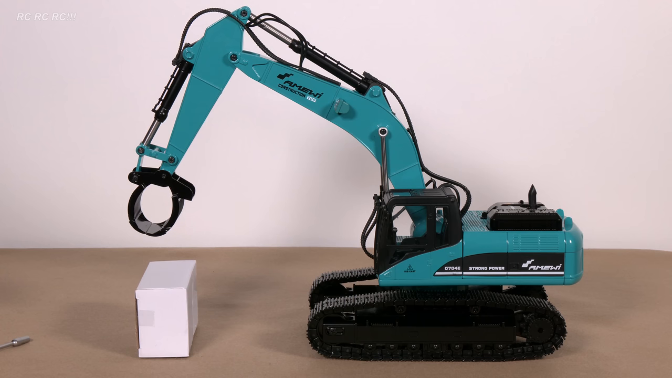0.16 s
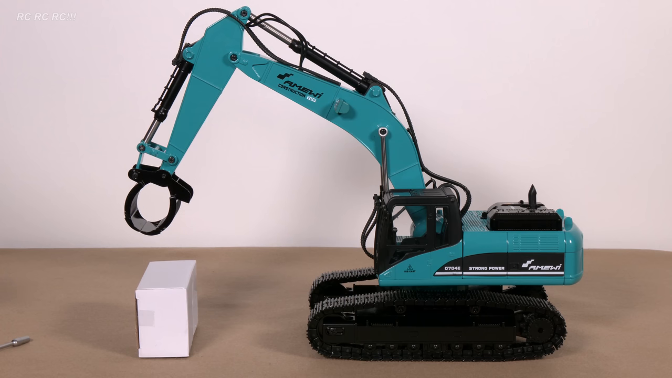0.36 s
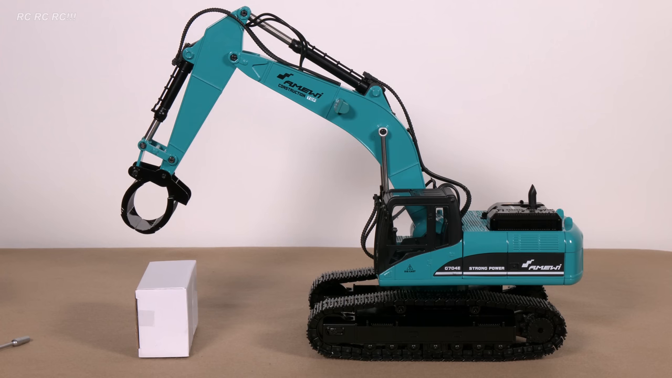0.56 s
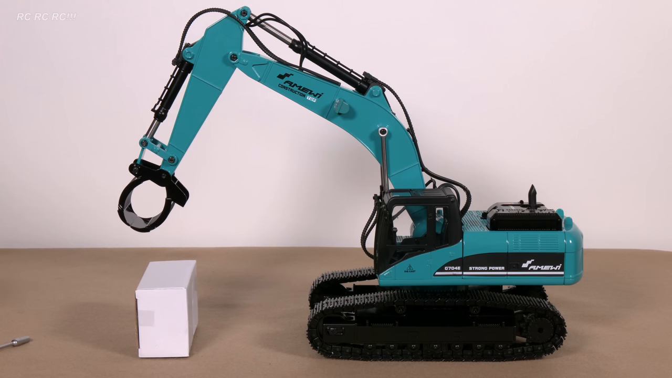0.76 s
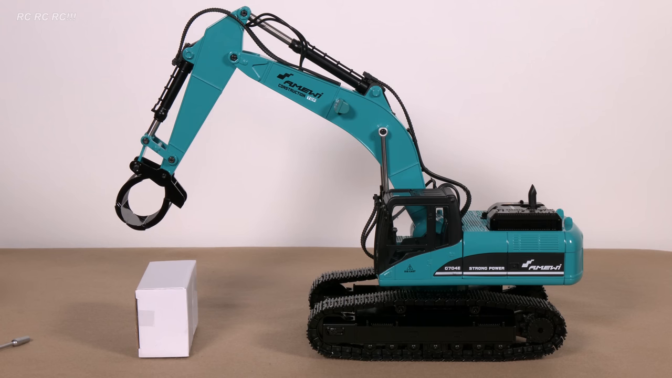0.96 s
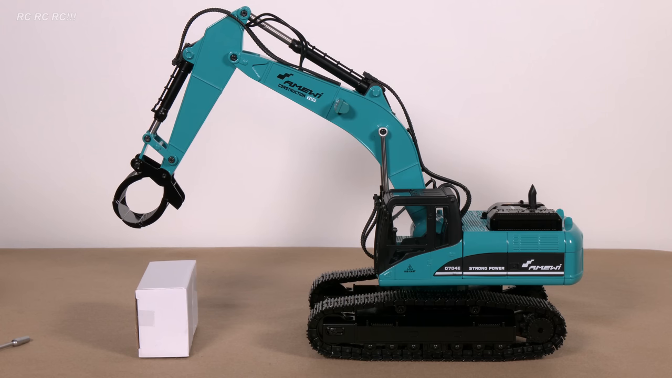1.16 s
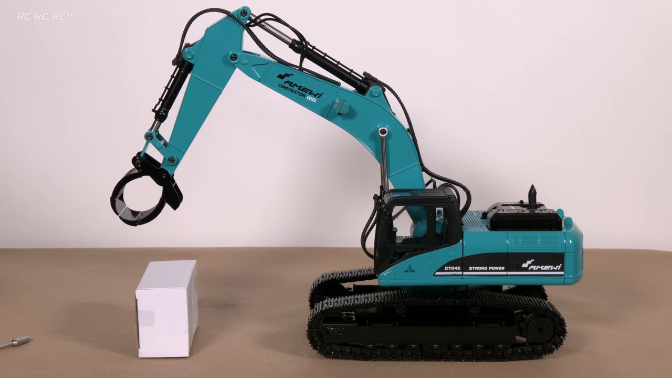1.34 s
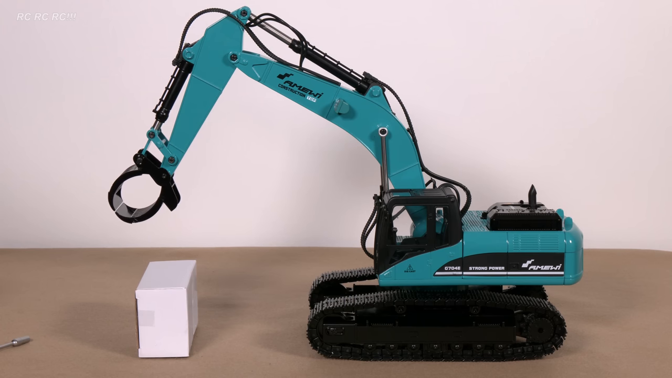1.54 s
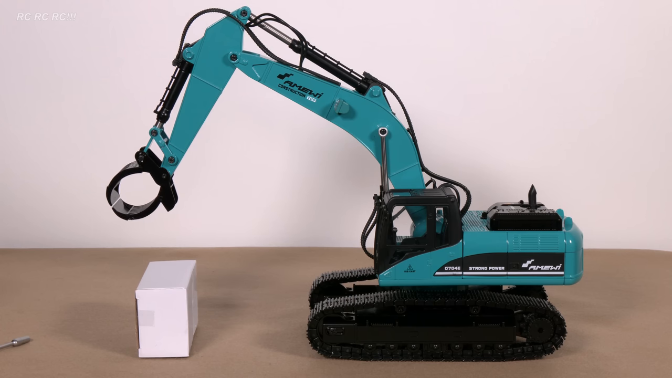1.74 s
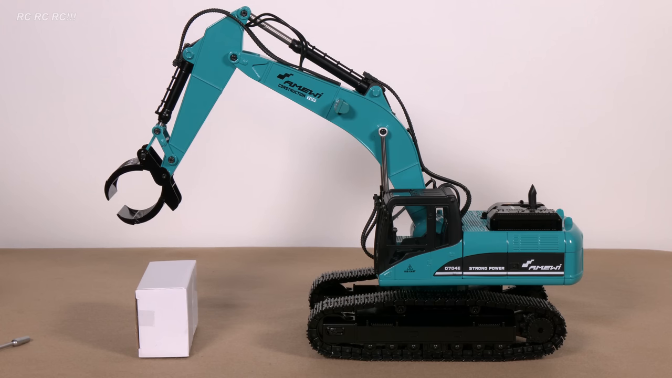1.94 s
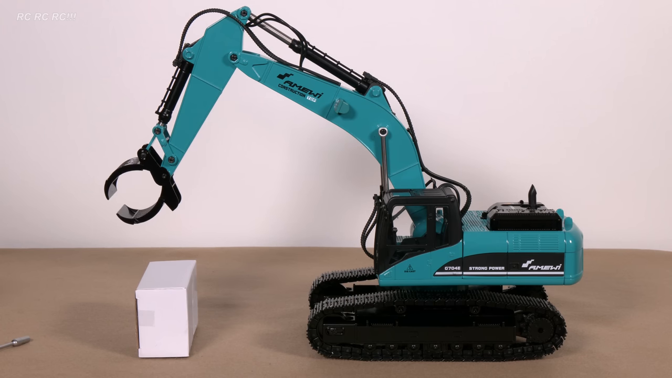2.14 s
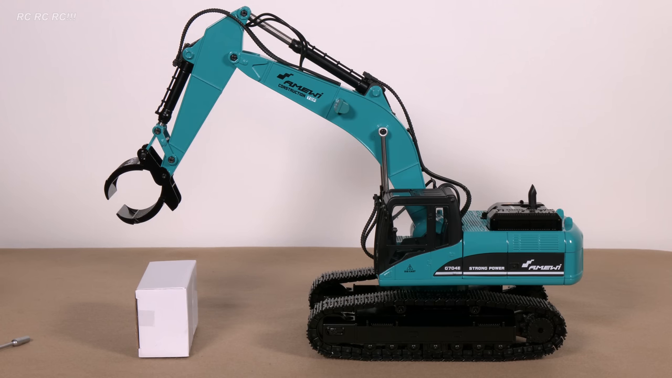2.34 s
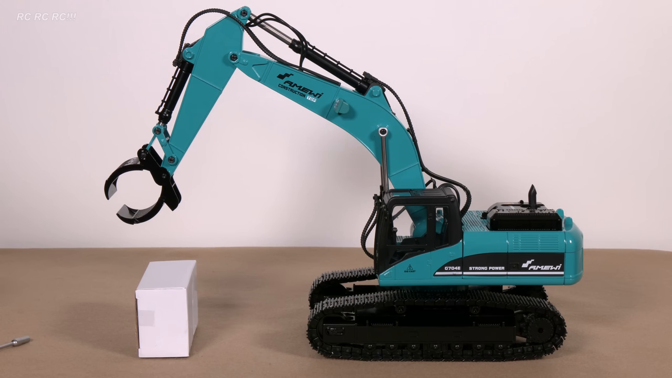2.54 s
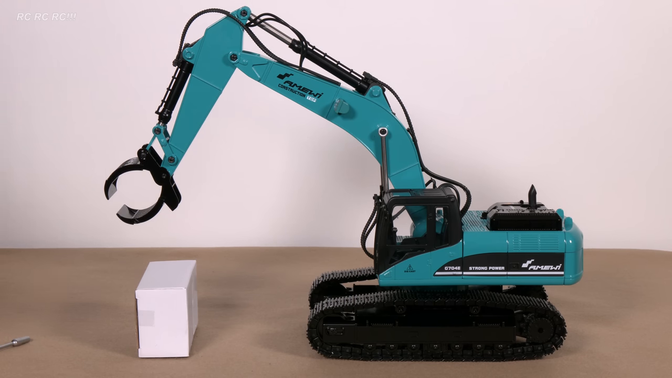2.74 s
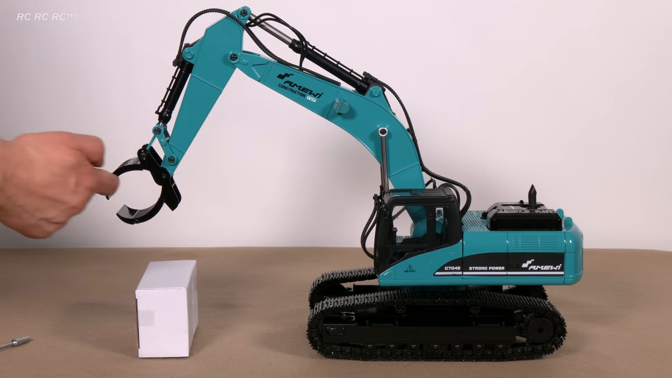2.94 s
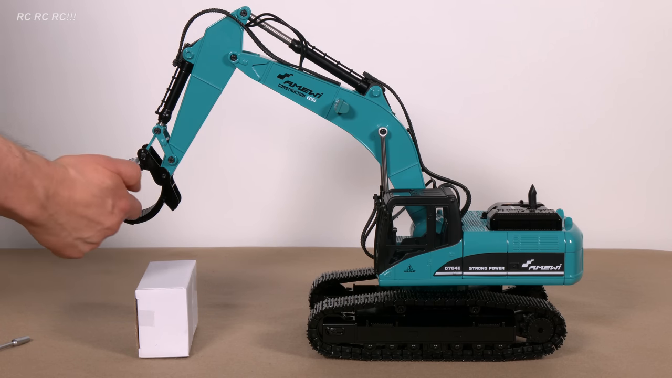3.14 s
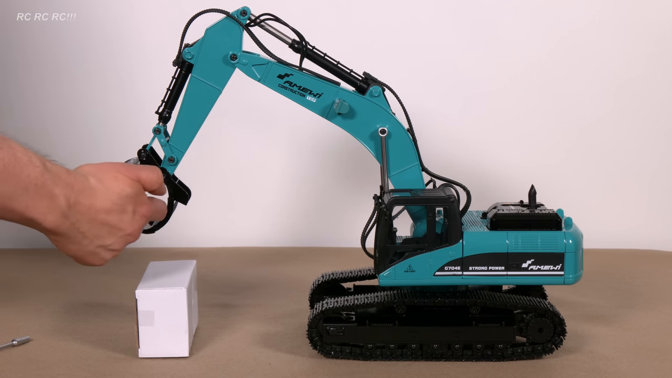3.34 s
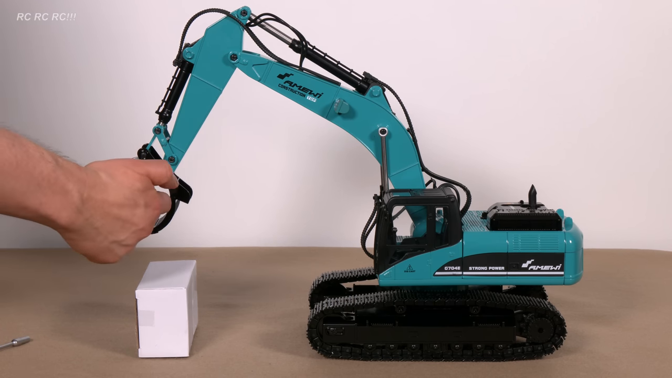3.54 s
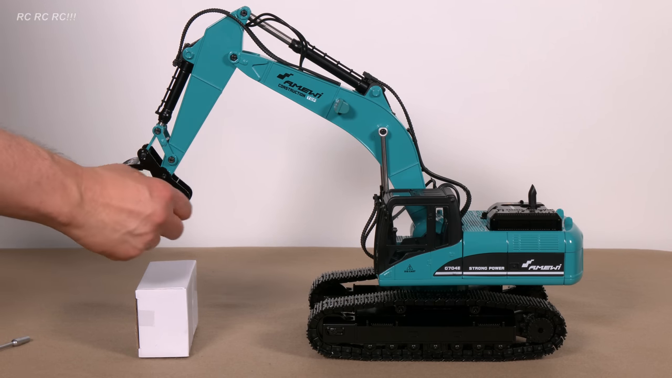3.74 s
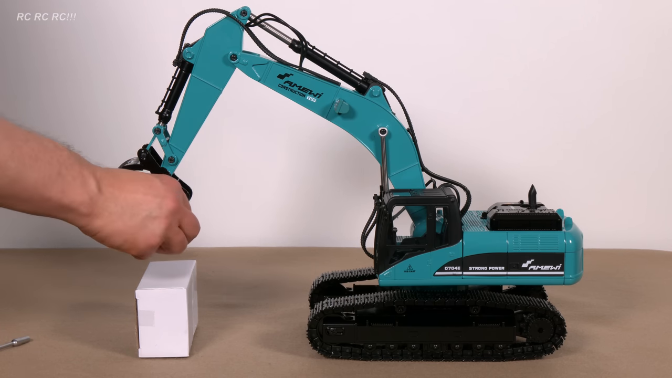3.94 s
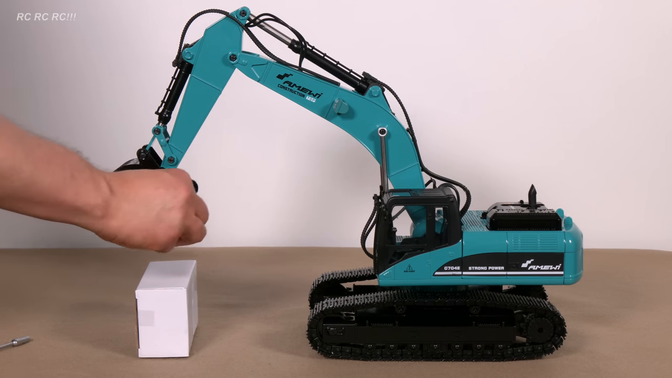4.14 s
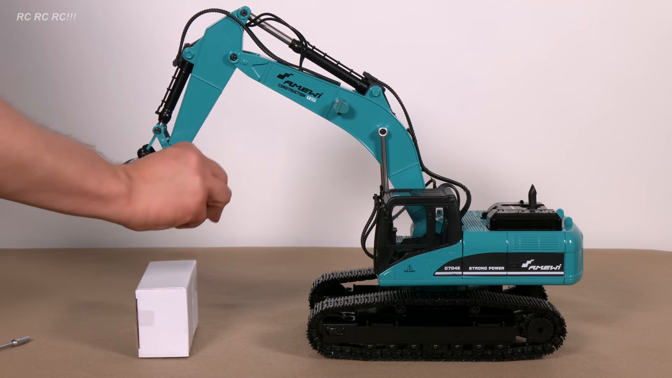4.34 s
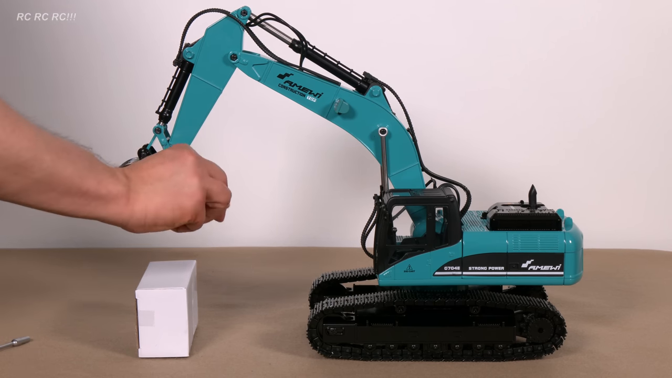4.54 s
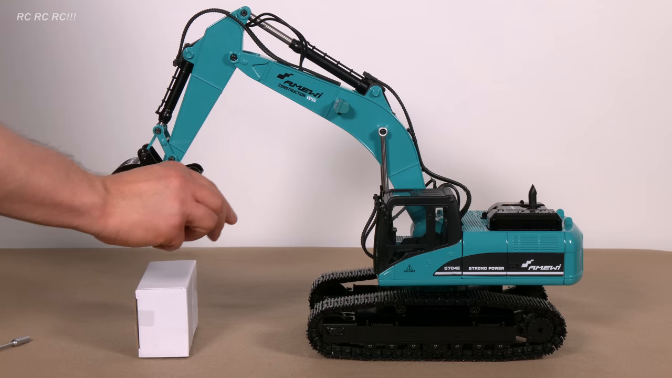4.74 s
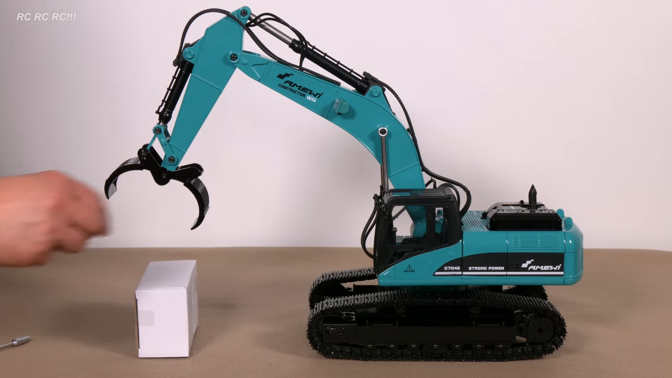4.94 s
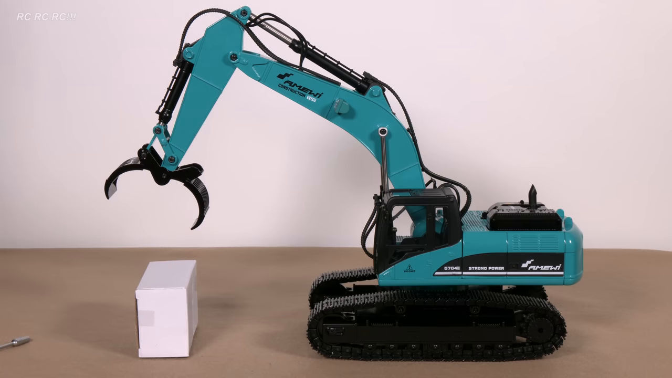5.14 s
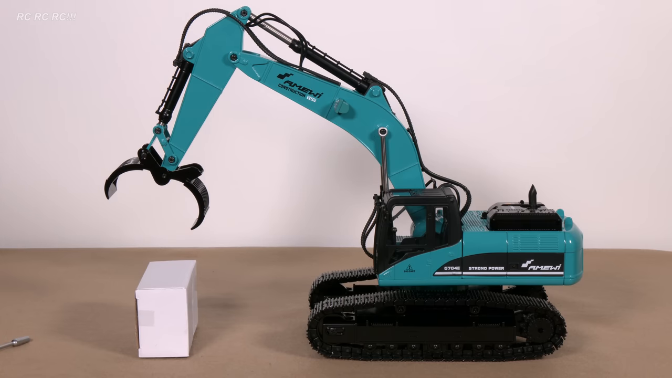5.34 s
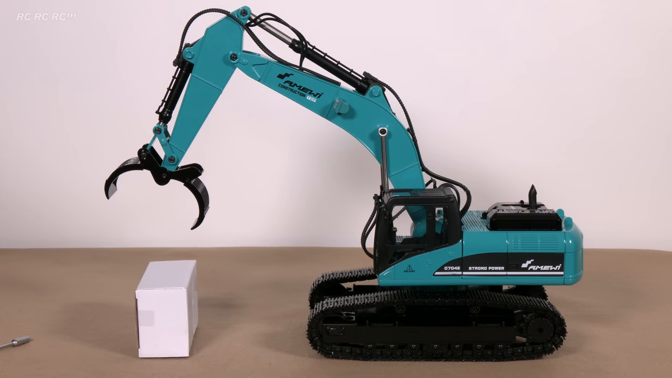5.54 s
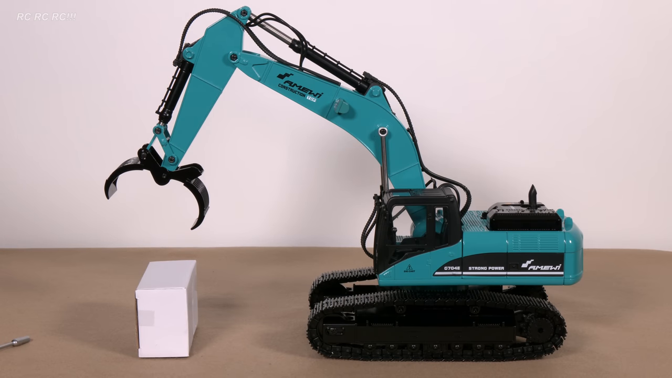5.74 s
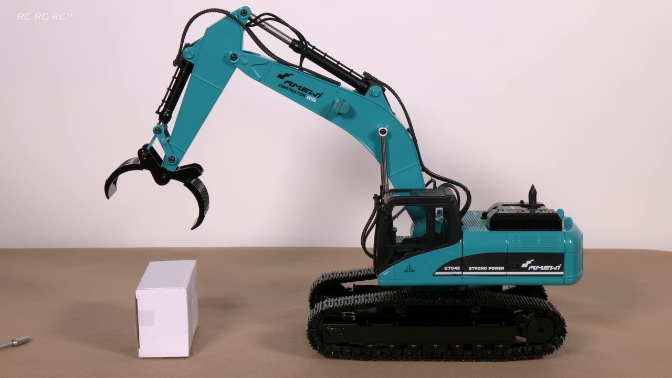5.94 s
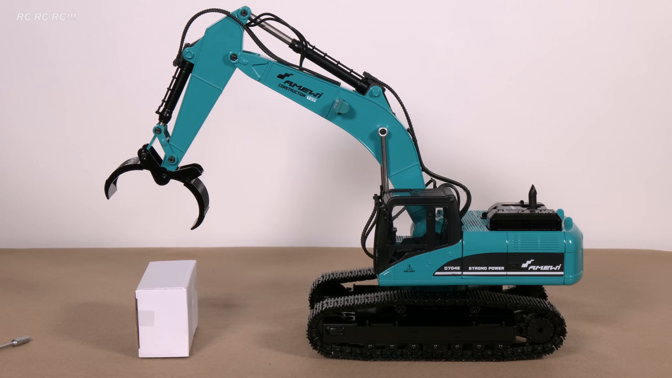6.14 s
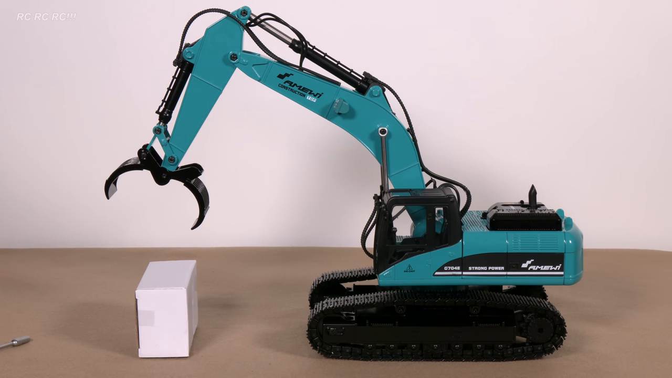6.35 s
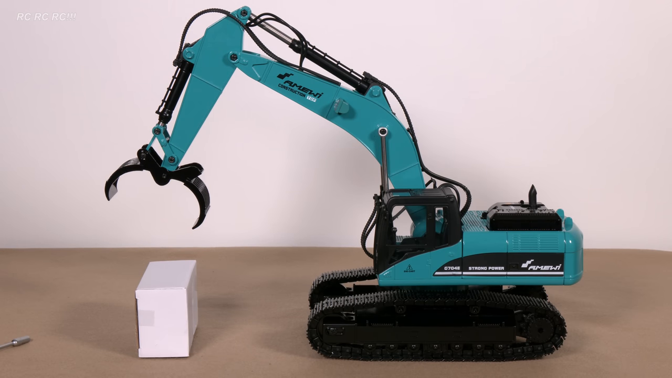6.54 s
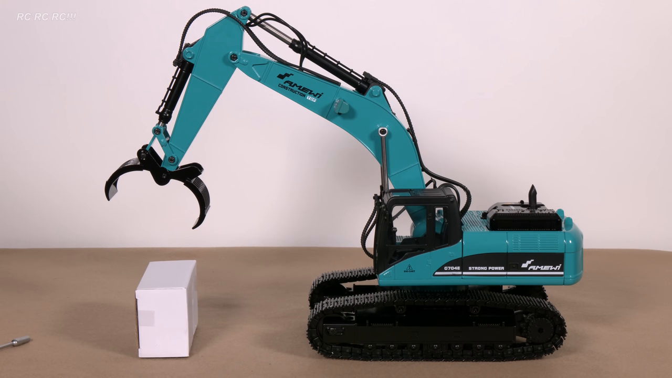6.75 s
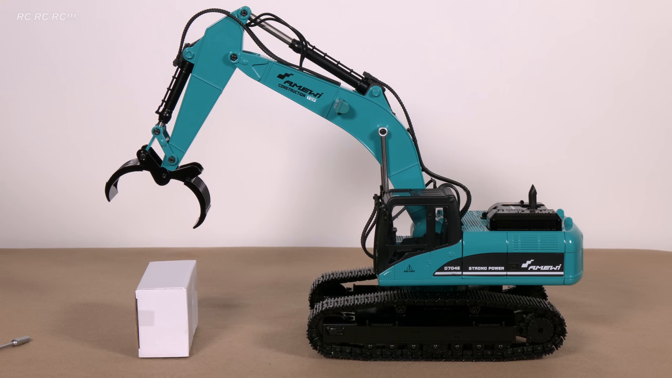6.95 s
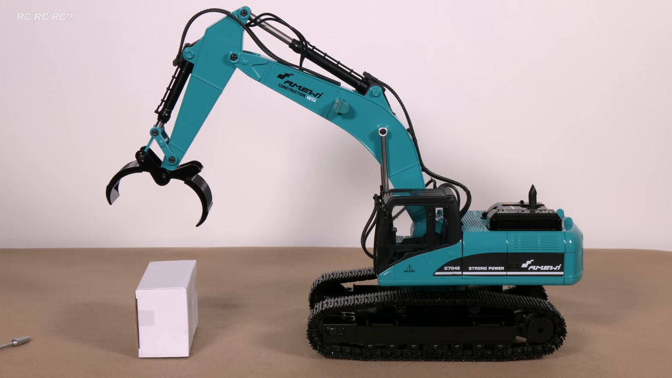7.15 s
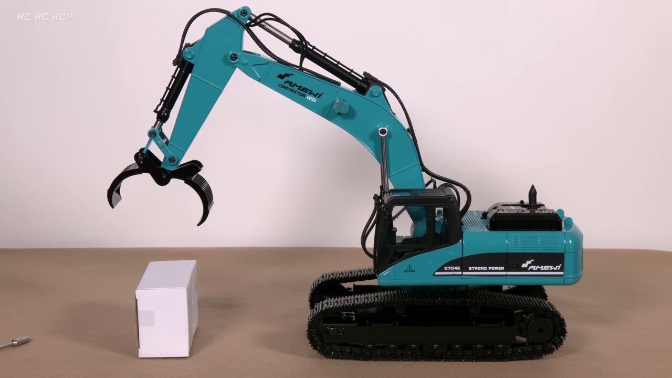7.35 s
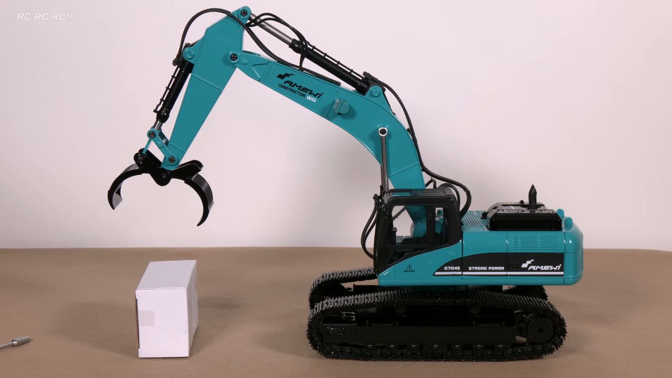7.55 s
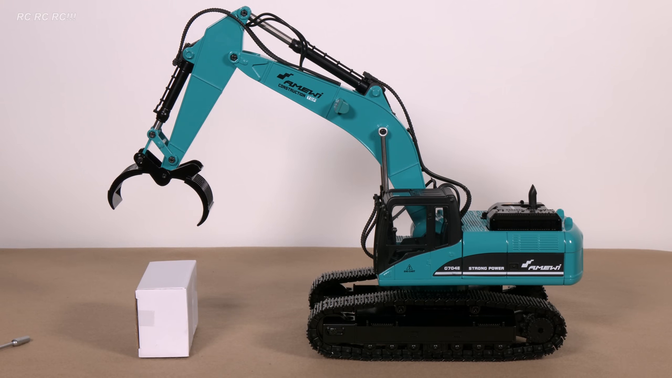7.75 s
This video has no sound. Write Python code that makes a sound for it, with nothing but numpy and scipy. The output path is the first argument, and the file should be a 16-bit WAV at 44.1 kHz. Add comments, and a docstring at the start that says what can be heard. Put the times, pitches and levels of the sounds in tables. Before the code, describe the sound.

Small electric gears whir in stop-start runs as a model excavator moves, with a sleeve swish and plastic jaws clicking in between.

```python
"""A model excavator on a table in a small room. First its geared motor tilts the grapple for two seconds:
tooth impacts rattle in the hollow plastic arm, and shaft and gears whine at multiples of the shaft rate.
Near 3 s a sleeve swishes by friction and a hand pulls the plastic jaws open; the knocks excite their
modes and small metal parts of the hinge. The hand draws back, at 6.3 s the motor is nudged slowly,
and at 7 s it runs once more. Soft room noise and hum lie under it all."""
import sys
import numpy as np
from scipy import signal
from scipy.fft import rfft, irfft, next_fast_len
from scipy.io import wavfile

SR = 44100
rng = np.random.default_rng(int(sys.argv[2]) if len(sys.argv) > 2 else 0)


def master(y):
    """Save y as 16-bit WAV."""
    cut = np.clip(np.atleast_2d(y).T, -1, 1)
    pcm = np.round(cut * 32767)  # scale
    wavfile.write(sys.argv[1], SR, pcm.astype(np.int16))


N = 343539
TIME = np.arange(N) / SR
BINS = np.fft.rfftfreq(8192, 1 / SR)

# motor runs: t(on)/s, t(off)/s, t(fastest)/s, top shaft rate/Hz, bend of the speed arch/(Hz/s^2),
# mid-run swell of the load/dB
MOTOR_RUNS = [ (-0.2, 2.056, 1.9, 312.2, 1.15, 1.5), (6.338, 6.6, 6.54, 160, 2000, 1.1),
              (6.961, 7.484, 7.295, 301.5, 900, -1.2), ]
TILT, NUDGE, BACK = MOTOR_RUNS
# tooth count of each gear, pinion first
TEETH = (9, 27, 45)


def motor_rattle():
    """Impact noise of the geared motor, with its own spectrum in each of the three runs."""
    # gear noise spectra: f/Hz, relative density/dB
    tilt_spectrum = [(200, -35.5), (270, -17), (400, -11), (620, -13.5), (780, -5), (1000, -3),
                     (1280, -10.5), (3100, -13), (4000, -7), (5700, -11), (8000, -11), (9500, -16),
                     (13000, -21.5), (15500, -26.5)]
    nudge_spectrum = [(200, -25), (270, -11), (400, -6), (620, -13), (780, -1), (1000, -0.5), (1280, -7),
                      (2200, -5.5), (3100, -7.5), (5700, -6), (8000, -8.5), (9500, -16), (13000, -23),
                      (15500, -32)]
    back_spectrum = [(200, -25.5), (270, -13), (400, -6.5), (620, -10), (780, 1), (1000, -1), (1280, -7),
                     (2200, -5.5), (3100, -7.5), (5700, -5.5), (8000, -7.5), (9500, -12.5), (13000, -18),
                     (15500, -26)]
    tilt = arm_panels(TILT, tilt_spectrum, panels=3, level_db=-29.5, arm_share=1.08, dulling_db=9,
                      throb_db=.73, wear_db=3, rattle_db=4.5, slack=.08, rub_db=-4.5)
    nudge = arm_panels(NUDGE, nudge_spectrum, panels=2, level_db=-40.5, arm_share=.9, dulling_db=41,
                       throb_db=.5, wear_db=4.5, rattle_db=1.5, slack=.25, rub_db=-1.5)
    back = arm_panels(BACK, back_spectrum, panels=2, level_db=-31, arm_share=.52, dulling_db=13,
                      throb_db=1.54, wear_db=3, rattle_db=4, slack=.11, rub_db=-7.5)
    return tilt + nudge + back


def arm_panels(run, spectrum, panels, level_db, arm_share, dulling_db, throb_db, **contact):
    """Forced vibration: gear ticks drive the arm, and each panel radiates by its own path in the room."""
    # resonances of the hollow arm: f/Hz, bandwidth/Hz, gain/dB
    resonances = [(503.3, 10.4, 7.5), (718, 42, 5.5), (805, 37, 7), (837, 52, -6), (936, 11, -8.5),
                  (1022, 32, 3.5), (1046, 27, 4), (1100, 20, -1), (1574, 184, 5.5), (2480, 52, 3.5),
                  (4614, 45, 7), (5100, 90, 0.5), (5744, 440, 6.5), (7530, 72, 6), (8230, 240, 6),
                  (10430, 250, 4), (12700, 820, 4)]
    # the gears bind and lurch: t/s, added level/dB
    lurches = [(1.293, 5), (6.349, 5), (6.455, 7), (6.557, 10.5), (6.59, 9), (6.972, 7.5), (7.111, 3),
               (7.481, 2)]
    t, shaft_hz, loudness = drive(run)
    shaft_hz = shaft_hz * (1 + .0025 * drift(len(t), 18))
    turns = np.cumsum(shaft_hz) / SR
    pace = shaft_hz / shaft_hz.max()
    arm_db = sum(db / (1 + (2 * (BINS - hz) / width) ** 2) for hz, width, db in resonances)
    shape_db = across(spectrum, BINS) + arm_share * arm_db
    load_db = throb_db * drift(len(t), 56)  # the screw binds and frees
    load_db += sum(db * np.exp(-((t - s) / .0021) ** 2) for s, db in lurches)
    gain = amp(level_db + load_db) * loudness / np.sqrt(panels)
    out = np.zeros(N)
    for _ in range(panels):
        hard = unit(colour(gear_ticks(turns, **contact), shape_db))
        soft = colour(hard, -dulling_db / (1 + (9000 / (BINS + 1)) ** 6))  # slow teeth land softly
        add(out, t[0], room(gain * (pace * hard + (1 - pace) * soft), wet_db=-2))
    return out


def gear_ticks(turns, wear_db, rattle_db, slack, rub_db):
    """Impact and friction: one impulse per pinion tooth; each gear's wear repeats with its revolution."""
    teeth_passed = np.floor(turns * TEETH[0]).astype(int)
    onsets = np.flatnonzero(np.diff(teeth_passed))
    tooth = teeth_passed[onsets]
    cycle = np.lcm.reduce(TEETH)
    wear = unit(sum(rng.standard_normal(count)[tooth % count] for count in TEETH))
    seat = rng.random(cycle)[tooth % cycle]  # each pair of teeth meets a little early or late
    scatter, play = rng.standard_normal((len(onsets), 2)).T
    delay = ((seat + slack * play) * np.gradient(onsets)).astype(int)
    force = amp(wear_db * wear + rattle_db * scatter) * rng.choice([-1, 1], cycle)[tooth % cycle]
    ticks = np.zeros(len(turns))
    np.add.at(ticks, np.clip(onsets + delay, 0, len(turns) - 1), force)
    # brushes and sliding flanks
    rub = rng.standard_normal(len(turns)) * (1 + .21 * np.cos(2 * np.pi * turns))
    return unit(unit(ticks) + amp(rub_db) * rub)


def drive(run, spin_up_s=.045, coast_s=.3, attack_s=.0086, release_db_per_s=340):
    """Inertia: the shaft spins up, follows the throttle's arch and coasts. Gives time, rate and gain."""
    on, off, fastest, top_hz, bend, swell_db = run
    t = np.arange(max(on, 0), off + .08, 1 / SR)
    coasting = np.maximum(t - off, 0)
    arch_hz = np.maximum(top_hz - bend * (t - fastest) ** 2, top_hz / 10)
    shaft_hz = arch_hz * (1 - .35 * np.exp((on - t) / spin_up_s)) * np.exp(-coasting / coast_s)
    load_db = swell_db * np.sin(np.pi * (t - on) / (off - on)) - release_db_per_s * coasting
    attack = 1 - np.exp((on - t) / attack_s)
    return t, shaft_hz, amp(load_db) * (shaft_hz / top_hz) ** .66 * attack


def motor_whine():
    """Periodic forcing: shaft, gear train and tooth mesh sound as tones in the two fast runs."""
    # partials in each direction of travel: multiple of the shaft rate, relative level/dB
    outward_orders = [(1, -14.5), (2.33, -26), (2.53, -21), (2.8, -23.5), (3.07, -21), (3.2, -14.5),
                      (3.6, -29), (4.8, -27), (5, -20.5), (14.6, -28), (15, -18), (16, -21.5), (18, -27),
                      (21, -24), (24, -30)]
    return_orders = [(18, -18), (21, -20), (24, -17), (27, -21), (34, -26), (36, -21), (42, -33), (48, -30),
                     (51, -34)]
    # the pinion's mesh tone builds as the grapple tilts out: t/s, gain/dB
    mesh_swell = [(0, -56), (.22, -46), (1.1, -43), (1.9, -40.5), (2.06, -48)]
    tones = shaft_orders(TILT, outward_orders, db=-27, waver=.056, steepness=2.9)
    tones += shaft_orders(BACK, return_orders, db=-31, waver=.05, steepness=5)
    tones += shaft_orders(BACK, [(1, 0)], db=-40, waver=.06, steepness=19)  # shaft hum at top speed
    mesh = shaft_orders(TILT, [(TEETH[0], 0)], db=0, waver=.06, steepness=3)
    return tones + mesh * amp(np.interp(TIME, *np.transpose(mesh_swell)))


def shaft_orders(run, orders, db, waver, steepness, period_turns=15):
    """Harmonics of the gear train's period, wavering; their amplitude follows a power law of speed."""
    t, shaft_hz, loudness = drive(run)
    shaft_hz = shaft_hz * (1 + .00116 * drift(len(t), 14.4))
    turns = np.cumsum(shaft_hz) / SR
    out, tones = np.zeros(N), np.zeros(len(t))
    for order, order_db in orders:
        unsteady = min(waver * np.sqrt(order), .6) * (drift(len(t), 22) + 1j * drift(len(t), 32))
        cycles = round(order * period_turns) / period_turns * turns
        tones += amp(order_db) * ((1 + unsteady) * np.exp(2j * np.pi * (cycles + rng.random()))).real
    add(out, t[0], np.sqrt(2) * amp(db) * loudness * tones * (shaft_hz / shaft_hz.max()) ** steepness)
    return out


def ringing_parts(rod_damped_s=1.6, rod_db_per_s=5.5):
    """Resonance of the piston rod, the arm's strongest panel and the gearbox casing."""
    # hum of the panel in each run: gain/dB
    panel_gains = [-43.5, -50, -40]
    # casing modes that stand out at a crawl: f/Hz, bandwidth/Hz, gain/dB
    casing_modes = [(789, 35, -56), (1575, 40, -61), (2500, 64, -52), (5830, 140, -54.5)]
    # the rod rings more the farther it is from its best-damped position
    rod_db = rod_db_per_s * abs(np.minimum(TIME, TILT[1]) - rod_damped_s)
    rod = driven_mode(TILT, hz=5020, width_hz=150, db=-46.5) * amp(rod_db)
    panel = sum(driven_mode(run, hz=1003.2, width_hz=39.3, db=db)
                for run, db in zip(MOTOR_RUNS, panel_gains))
    casing = sum(driven_mode(NUDGE, *mode) for mode in casing_modes)
    return rod + panel + casing


def driven_mode(run, hz, width_hz, db):
    """Broadband excitation: the gear ticks keep one narrow mode ringing."""
    t, shaft_hz, loudness = drive(run)
    ticks = gear_ticks(np.cumsum(shaft_hz) / SR, wear_db=1, rattle_db=4.5, slack=.27, rub_db=1)
    mode = colour(ticks, -20 * np.log10(1 + (2 * (BINS - hz) / width_hz) ** 4))
    out = np.zeros(N)
    add(out, t[0], amp(db) * loudness * unit(mode))
    return room(out, wet_db=-6.5)


def jaws(crack_db=1, body_db=-3, swell_s=.002):
    """Impulse response: each knock is a short plastic crack, and damped low modes swell just after it."""
    # knocks: t/s, base level/dB, relative body level/dB, treble/dB (-10.5 is neutral), crack T60/s
    knocks = [(2.736, -48, -8, -14, .02), (3.242, -49.5, -2, -11, .035), (3.397, -58, 16, -19, .03),
              (3.683, -37, 1.5, -10.5, .034), (3.732, -58, 12, -20, 0.028), (3.904, -48.5, -2, -28, .06),
              (4.105, -58, -2, -10, .02), (4.133, -52, 5, -16, .06), (4.156, -31.5, -1, -8, .024),
              (4.186, -50, -2, -5, .02), (4.209, -44, 4, -24, .05), (4.249, -40.5, -8, -6, .024),
              (4.454, -45.5, 6, -53, 0.086), (4.471, -45.5, -10, -22, .061),
              (4.681, -36.5, -6.5, -12, 0.077), (4.696, -41.5, -16, -17, 0.037), (5.817, -54, -6, -1, .04)]
    # spectrum of the crack: f/Hz, relative density/dB
    crack_spectrum = [(200, -8), (700, 3), (1100, 0), (1500, 1), (1950, 1.5), (2500, -5), (3300, -4.5),
                      (4300, -10.5), (5400, -13), (7300, -8), (8800, -15), (10000, -21), (15500, -38)]
    # modes of the jaws and arm: f/Hz, relative level/dB, T60/s
    modes = [(288.6, -7, 0.19), (334, -8, .11), (379.5, 2.5, 0.15), (461, 2.5, 0.1), (540, -14, .07),
             (753, -12, 0.085), (802, 0, 0.076), (993, -12, 0.19)]
    out, t = np.zeros(N), np.arange(SR // 4) / SR
    for s, db, low_db, high_db, crack_t60 in knocks:
        shelf_db = (high_db + 10.5) / (1 + (4500 / (BINS + 1)) ** 4)
        burst = rng.standard_normal(len(t)) * amp(-60 * t / crack_t60)
        crack = colour(burst, across(crack_spectrum, BINS) + shelf_db)
        crack /= np.std(crack[:SR // 250])  # rms 1 over the first 4 ms
        body = sum(amp(mode_db - 60 * t / t60) * np.sin(2 * np.pi * (hz * t + rng.random()))
                   for hz, mode_db, t60 in modes)
        add(out, s, room(amp(db + crack_db) * crack, wet_db=-3.5))
        add(out, s, amp(db + low_db + body_db) * body * (1 - np.exp(-t / swell_s)) ** 2)
    return out


def hinge(t60_s=.55):
    """Free vibration: lightly damped metal parts outlast the knocks and flutter as they die."""
    # pings of the hinge: t/s, f/Hz, initial level/dB
    pings = [(3.242, 6200, -71), (3.392, 5216, -71), (3.682, 5685, -65), (3.897, 6137, -65),
             (4.681, 4990, -60), (4.681, 6220, -64)]
    out, t = np.zeros(N), np.arange(SR // 2) / SR
    for s, hz, db in pings:
        flutter = 1 + .4 * drift(len(t), 50)
        add(out, s, amp(db - 60 * t / t60_s) * np.sin(2 * np.pi * hz * t) * flutter)
    return out


def sleeve(grain_db=1):
    """Stick-slip friction: fibres slip in small clumps, and each stroke swells and fades."""
    # strokes: t(peak)/s, level/dB, 20 dB rise/s, 20 dB fall/s, blend from reaching (0) to settling (1)
    strokes = [(2.75, -57.5, 0.053, 0.23, 0), (2.825, -52, 0.14, .15, 0), (2.958, -43, .16, 0.15, 0.17),
               (5.365, -52, 0.067, 0.24, 1), (5.5, -60, .5, .5, 0.87), (5.628, -50, .17, .15, 0.91),
               (5.85, -62, .2, .4, 0.63), (6.03, -59, 0.34, 0.1, 0.63)]
    # cloth reaching in and settling back: f/Hz, relative density/dB
    reach_spectrum = [(290, -54), (500, -16), (577, -5), (666, -11), (792, -4), (1450, -0.5), (1960, -5.5),
                      (3190, -5), (6550, -10.5), (15500, -26)]
    settle_spectrum = [(350, -18), (600, -4), (1510, -2), (1730, -5.5), (2070, -5), (5740, -14),
                       (11800, -22.5), (15500, -30)]
    out = np.zeros(N)
    for s, db, rise, fall, blend in strokes:
        t = np.arange(-2 * rise, 2 * fall, 1 / SR)
        slips = rng.standard_normal(len(t)) * amp(grain_db * drift(len(t), 200))
        shape_db = (1 - blend) * across(reach_spectrum, BINS) + blend * across(settle_spectrum, BINS)
        envelope = amp(db - 20 * np.maximum(-t / rise, t / fall))
        add(out, s + t[0], envelope * unit(colour(slips, shape_db)))
    return room(out, wet_db=-8)


def air(noise_db=-56):
    """Ambient noise: a soft continuous spectrum, and hums that waver in phase and amplitude."""
    # room noise: f/Hz, relative density/dB
    spectrum = [(25, -40), (60, -11), (110, -4.5), (200, -6.5), (300, -2.5), (430, -11), (500, -0.5),
                (570, -9.5), (740, -8), (900, -18), (1300, -21), (3000, -26.5), (8000, -30.5),
                (15500, -33.5)]
    # hums: f/Hz, level/dB
    hums = [(48.4, -67.5), (393, -67.5), (497, -64.5)]
    out = np.zeros(N)
    for hz, db in hums:
        phase = 2 * np.pi * hz * TIME + hz / 450 * drift(N, 6.1)
        out += amp(db) * np.sqrt(2) * np.sin(phase) * (1 + .39 * drift(N, 2.8))
    return out + amp(noise_db) * unit(colour(rng.standard_normal(N), across(spectrum, BINS)))


def room(x, wet_db, echoes_per_s=4000):
    """Reverberation: sparse reflections of random sign, each band decaying at its own rate."""
    # reverberation time: f/Hz, T60/s
    decay_times = [(250, 0.98), (660, 0.35), (1740, 0.37), (4600, 0.32), (9000, 0.26), (15000, 0.29)]
    t = np.arange(SR // 2) / SR
    echoes = rng.choice([-1., 1.], len(t)) * (rng.random(len(t)) < echoes_per_s / SR) * (t > .003)
    hz, s, bands = signal.stft(echoes, SR, nperseg=256)
    tail = signal.istft(bands * amp(-60 * s / across(decay_times, hz)[:, None]), SR)[1]
    out = amp(wet_db) * signal.oaconvolve(x, tail / np.linalg.norm(tail))
    out[:len(x)] += x
    return out[:N] / np.hypot(1, amp(wet_db))


def colour(x, db):
    """Minimum-phase filter: the gain is db on BINS, taken relative to its peak."""
    log_gain = np.log(amp(np.maximum(db - db.max(), -100)))
    two_sided = np.concatenate([log_gain, log_gain[-2:0:-1]])
    taps = np.fft.ifft(np.exp(np.conj(signal.hilbert(two_sided)))).real[:len(BINS)]
    return signal.oaconvolve(x, taps)[:len(x)]


def drift(size, hz):
    """Random fluctuation of rms 1, low-passed at hz."""
    count = next_fast_len(size)
    rolloff = 1 + (np.fft.rfftfreq(count, 1 / SR) / hz) ** 4
    return unit(irfft(rfft(rng.standard_normal(count)) / rolloff, count))[:size]


def across(points, hz):
    """Interpolation on a log-frequency axis."""
    f, value = np.transpose(points)
    return np.interp(np.log(hz + 1), np.log(f + 1), value)


def amp(db):
    """Level to amplitude ratio."""
    return 10 ** (np.asarray(db) / 20)


def unit(x):
    """Normalisation to rms 1."""
    return x / np.sqrt(np.mean(x ** 2) + 1e-20)


def add(mix, s, sound):
    """Superposes a sound on the mix from s seconds."""
    part = mix[round(s * SR):][:len(sound)]
    part += sound[:len(part)]


def scene():
    """Superposition of three motor runs, the hand's work between them and the room, in one channel."""
    motor = motor_rattle() + motor_whine() + ringing_parts()
    return (motor + jaws() + hinge() + sleeve() + air())[None]


def record(dry, cutoff_hz=15780):
    """Band limiting by a steep linear-phase low-pass filter."""
    lowpass = signal.firwin(1023, cutoff_hz, window=("kaiser", 9), fs=SR)
    return signal.oaconvolve(dry, lowpass[None], "same")


dry = scene()
out = record(dry)
master(out)
```